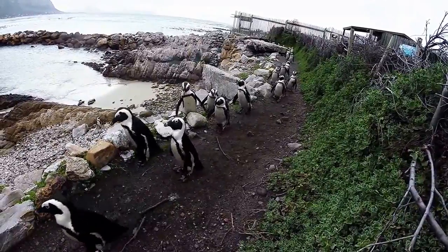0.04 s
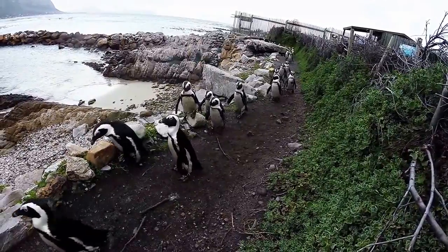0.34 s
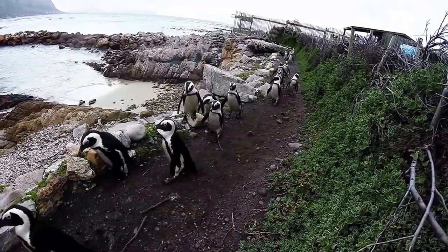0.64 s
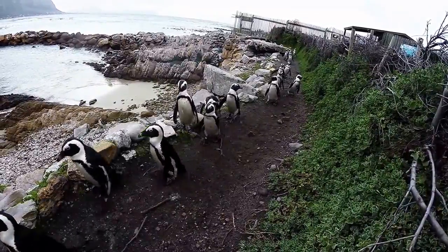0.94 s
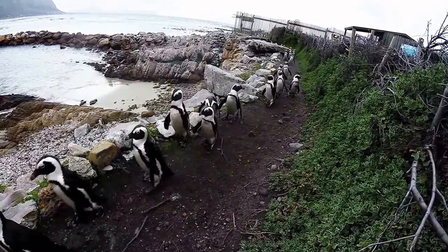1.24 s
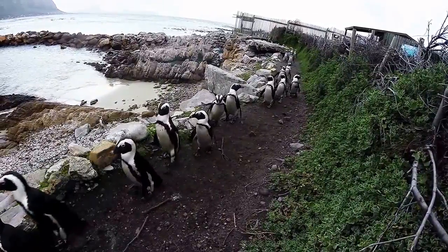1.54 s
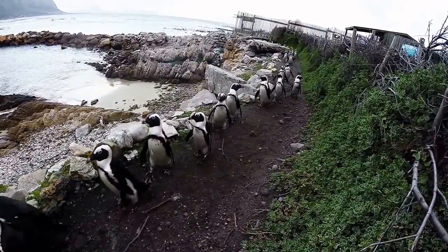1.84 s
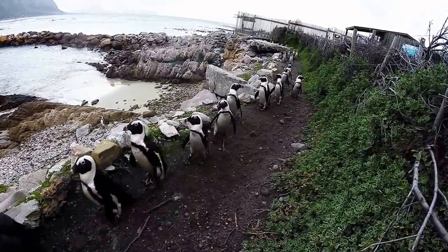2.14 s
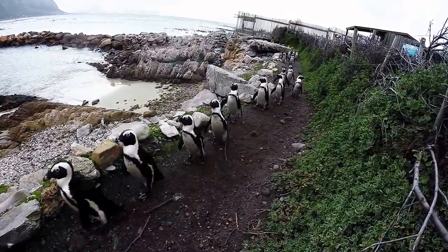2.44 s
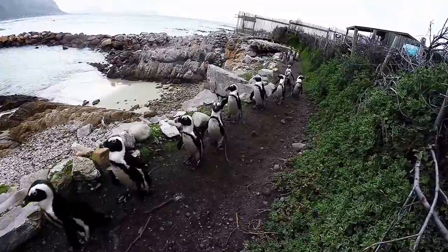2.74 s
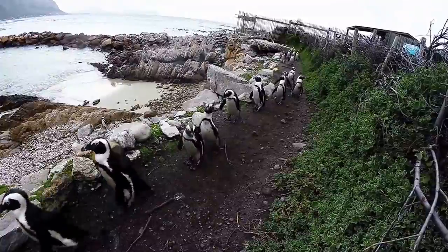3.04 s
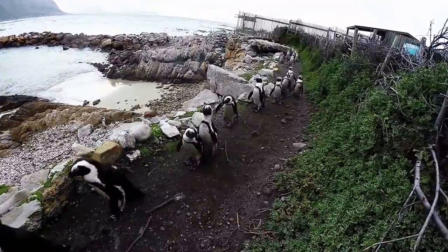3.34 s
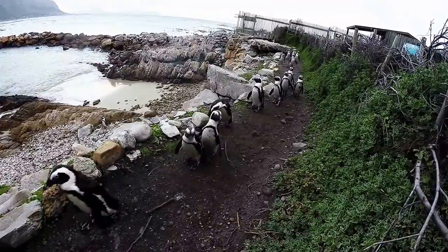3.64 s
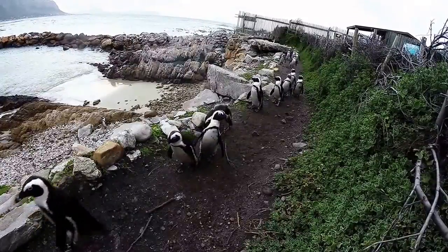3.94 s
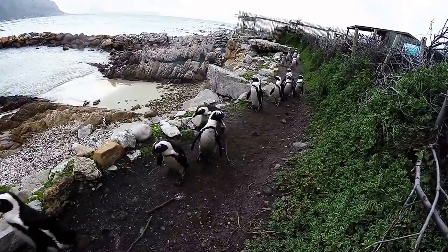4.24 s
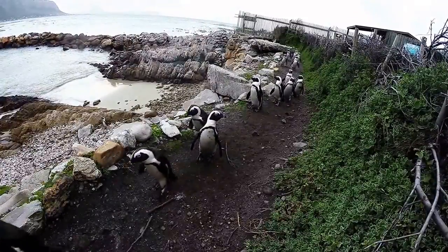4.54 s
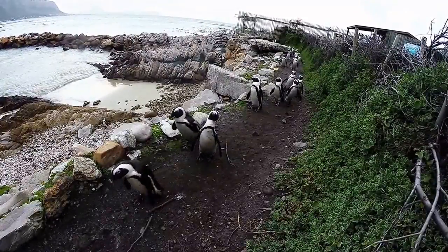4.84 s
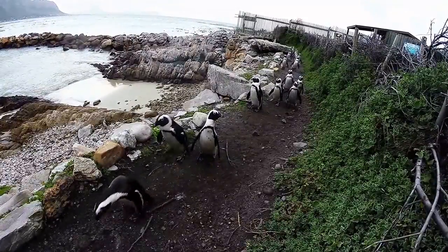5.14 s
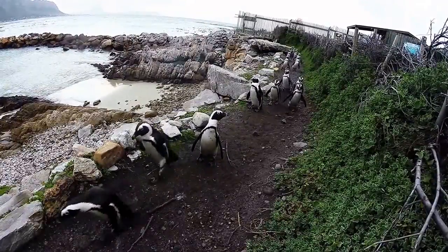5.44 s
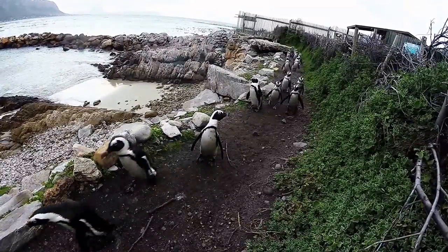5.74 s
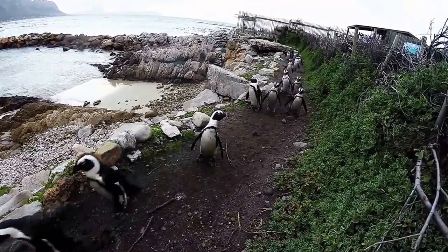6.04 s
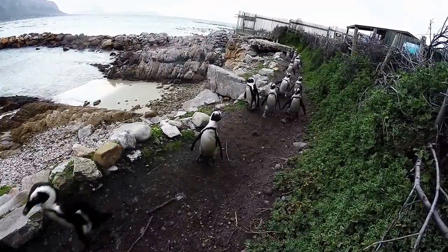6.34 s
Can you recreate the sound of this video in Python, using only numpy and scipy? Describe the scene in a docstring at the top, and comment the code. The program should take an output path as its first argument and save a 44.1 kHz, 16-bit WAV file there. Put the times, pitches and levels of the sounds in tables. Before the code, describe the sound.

Close to the microphone, a hand shifts on a camera pole, making hollow rubs, small creaks and squeaky ticks through the plastic housing. The handling grows busier about halfway through, with a low rumble as the pole sways. Near the end a quick run of jolts makes the pole boom and judder, the loudest moment. Soft, steady surf washes on a rocky shore behind it all.

```python
"""A hand rubs and creaks on a camera pole, close up and hollow, over a soft wash of surf.
Stick-slip friction of the grip drums on the shaft and rings the air and plastic shell of the housing;
the mount ticks and squeaks through the same housing. The pole rumbles as it swings, and near the end
a run of jolts sets it booming and juddering in its bending modes. Faint pips and a whine sit on top."""
import sys
import numpy as np
from scipy import signal
from scipy.fft import rfft, irfft, next_fast_len
from scipy.io import wavfile
from scipy.ndimage import uniform_filter1d, map_coordinates

SR = 44100
rng = np.random.default_rng(int(sys.argv[2]) if len(sys.argv) > 2 else 0)


def pcm_store(signal):
    """Save signal as 16-bit PCM."""
    levels = np.round(np.clip(np.atleast_2d(signal), -1, 1) * 32767)
    wavfile.write(sys.argv[1], SR, levels.astype(np.int16).T)


N = 287091

# slides of the hand along the pole: (start [s], length [s], shaft drumming [dB], rub [dB])
HAND_SLIDES = [(0.0, 0.19, -54.5, -66), (0.256, 0.028, -45.5, -67), (1.555, 0.34, -57.5, -69),
               (1.94, 0.11, -49, -62.5), (2.081, 0.15, -42.5, -54), (2.352, 0.088, -52.5, -85),
               (2.98, .41, -49, -57.5), (3.4, 0.13, -45, -52), (3.558, 0.14, -46, -50.5),
               (3.716, 0.093, -43, -49), (3.825, 0.13, -46, -54), (3.977, 0.16, -50, -57),
               (4.193, 0.1, -46.5, -56), (4.332, 0.049, -45, -58), (4.467, 0.065, -47, -59),
               (4.57, 0.14, -49, -59), (5.19, 0.33, -60, -64), (5.57, 0.13, -56, -55),
               (5.707, 0.16, -45, -51), (5.894, 0.15, -42, -48), (6.057, 0.12, -51, -54),
               (6.149, .17, -49, -53), (6.382, 0.074, -42.5, -55)]
# hollow resonances of the air in the housing: (frequency [Hz], width [Hz], gain [dB])
AIR_MODES = [(624, 217, -5.5), (807, 180, -0.5), (1073, 104, 2.5), (1500, 138, 4), (1900, 128, 3),
             (2290, 175, 4), (2618, 140, -9)]
# resonances of the housing's plastic shell: (frequency [Hz], width [Hz], gain [dB])
SHELL_MODES = [(3057, 250, -4), (3225, 24, 4.5), (4044, 760, 1.5), (4217, 290, 0.5), (4880, 230, -13),
               (5340, 160, -5), (6400, 1300, -10)]
# higher resonances of the shaft: (frequency [Hz], width [Hz], gain [dB])
SHAFT_MODES = [(230.6, 31, 3.5), (326.3, 49.7, -1.5), (375.5, 31, -1.5), (539, 160, -21)]
# creaks of the mount, with squeak and knock relative to the creak:
# (time [s], level [dB], squeak pitch [Hz], squeak [dB], knock [dB], length [s])
MOUNT_CREAKS = [(0.053, -40.5, 1515, -3, -18, 0.0057), (0.466, -40, 994, -6, -18, 0.0052),
                (1.047, -49, 1540, -4, -15, 0.0056), (1.348, -34.5, 1385, -9, -4, 0.0048),
                (1.599, -45.5, 1596, -4, -9, .005), (1.742, -41.5, 1126, -7.5, 0, 0.0074),
                (2.381, -47.5, 1400, -9, -8, 0.0037), (2.651, -43, 1000, -10, -16, 0.0037),
                (2.682, -41.5, 1440, -9, -13, 0.0034), (2.834, -45, 1500, -19, -10, 0.0051),
                (2.979, -42, 1530, 7, -10, 0.0034), (3.045, -37.5, 1817, -9, -14, 0.0035),
                (3.154, -28.5, 2580, -4, -7, 0.0064), (3.165, -32, 1896, -5.5, -0.5, 0.0061),
                (3.304, -44.5, 1050, -12, -14, .0057), (3.437, -38, 1870, -9, -9, 0.0062),
                (3.504, -28.5, 1506, 4, -18, 0.0044), (3.688, -34.5, 2190, -10, -20, 0.0061),
                (3.738, -27, 1540, -12, -20, 0.01), (3.873, -39, 1570, -10, -7, 0.0064),
                (4.057, -40, 1490, -19, -8, 0.0074), (4.077, -36, 2590, -4, -12, .006),
                (4.265, -41, 1440, -3, 0, 0.0075), (4.435, -42.5, 1510, -19, -3, 0.0088),
                (4.793, -29, 1107, -4.5, -7.5, 0.0053), (5.146, -44, 1130, -2, -16, .003),
                (5.338, -38.5, 2204, -12, 0, 0.0059), (5.403, -32.5, 1526, -8, -4, 0.004),
                (5.57, -37, 1405, -8, -7, .006), (5.614, -39, 2330, -11, -7.5, .01),
                (5.707, -30, 1440, -5, 1, 0.0059), (5.747, -32, 1543, 1.5, -22, 0.0045),
                (5.935, -34.5, 1460, -3, 0, 0.0036), (6.174, -37.5, 1460, -2, 3.5, 0.0046),
                (6.398, -39, 1070, 4, -15, 0.0049)]
# jolts that bend the pole: (time [s], lower mode [dB], upper mode [dB], push length [s])
POLE_JOLTS = [(.03, -42.5, -52, .025), (3.731, -39, -44, 0.033), (4.793, -34, -62, 0.027),
              (5.678, -19.5, -47, 0.045), (5.748, -22.5, -22.5, 0.043), (5.835, -32, -13, 0.036),
              (5.873, -19.5, -15, 0.032), (5.97, -22, -25, 0.011), (6.022, -22.5, -27, 0.024),
              (6.065, -16, -34.5, 0.035), (6.319, -31.5, -54, 0.046)]
# the pole's lower and upper bending modes: (frequency [Hz], time to fall 60 dB [s])
BENDING_MODES = [(88, 0.39), (131, 0.11)]
# swings of the pole: (start [s], length [s], sway [dB])
POLE_SWINGS = [(.22, .19, -41), (1.04, .15, -42.5), (2.03, 0.13, -42), (3.0, 0.29, -37.5),
               (3.67, 0.19, -38.5), (4.58, 0.17, -38), (4.96, 0.093, -39), (5.21, 0.16, -35),
               (5.54, .46, -35), (6.08, 0.1, -36), (6.25, 0.26, -37.5)]
# resonances of the trembling and of the juddering pole: (frequency [Hz], width [Hz], gain [dB])
TREMOR_MODES = [(84.4, 14.4, 2), (133.7, 26.3, -4.5)]
JUDDER_MODES = [(179, 27, -4.5), (217, 25, 2), (315, 50, -5), (502, 140, -21)]
# faint high pips: (time [s], pitch [Hz])
HIGH_PIPS = [(3.01, 6160), (3.79, 5800), (4.104, 5970), (4.153, 5750), (4.264, 6640)]
# tone curve of the surf: (frequency [Hz], relative density [dB])
SURF_SPECTRUM = [(20, -18.5), (50, -7.5), (100, -14.5), (170, -19.5), (235, -17.5), (330, -24),
                 (480, -25.5), (1100, -31.5), (2300, -34.5), (3200, -37.5), (5500, -41.5), (8000, -47.5),
                 (12000, -53), (15000, -58)]
# whine of the electronics: (pitch [Hz], level [dB])
WHINE_TONES = [(12647, -95), (12707, -99), (13126, -99)]

ORDINARY_RUB_DB = -53.5  # scrape and tremor follow the rub above and below this level
SCRAPE_DB, SCRAPE_DB_PER_RUB_DB = -57, 1.23
TREMOR_DB, TREMOR_DB_PER_RUB_DB = -47, 0.77
CLACK_DB, CLACK_DB_PER_S = -24.5, 1099  # a longer creak wakes the shell more
JUDDER_DB, JUDDER_POWER = -32.5, 1.9  # level at the hardest bend; power law with the strain
PIP_DB, SURF_DB, TOP_HZ = -64, -54, 15200


def grip(drum_db, rub_db):
    """Hand friction drums on the shaft, rubs the housing's low modes and scrapes its upper ones."""
    drum = unit(muffle(ring(slips(rate=450, spread_db=1, hiss=1), SHAFT_MODES), 640, order=2))
    rub = unit(muffle(housing_air(slips(rate=700, spread_db=5, hiss=1)), 1236, order=5))
    grit = slips(rate=900, spread_db=5, hiss=0.99)
    bright_air = filtered(housing_air(grit), lambda hz: 1 / (1 + (1280 / (hz + 1)) ** 10))  # high-pass
    effort_db = rub_db - ORDINARY_RUB_DB
    shell_db = -16 + 0.31 * np.maximum(effort_db, 0)  # a harder rub wakes the shell
    scrape = unit(bright_air) + amp(shell_db) * unit(housing_shell(grit))
    scrape_db = SCRAPE_DB + SCRAPE_DB_PER_RUB_DB * effort_db
    catch_db = 2 * wobble(45)  # the grip catches and lets go
    snags = amp(-12) * unit(housing_air(slips(rate=45, spread_db=1, hiss=0.01)))
    return (drum * amp(drum_db + 1.3 * wobble(18))
            + rub * amp(rub_db + catch_db)
            + (scrape + snags) * amp(scrape_db + catch_db))


def hand_levels():
    """Drumming and rub envelopes in dB: the hand presses hardest in mid-slide, then rests."""
    start, length, drum_db, rub_db = np.transpose(HAND_SLIDES)
    shape = dict(attack_s=0.051, release_s=0.087, arch_db=1)
    return (strokes(zip(start, length, drum_db), rest_db=-58.5, **shape),
            strokes(zip(start, length, rub_db), rest_db=-67.5, **shape))


def mount_creaks():
    """Each creak is a quick run of slips that rings the housing, knocks the shaft and squeaks."""
    out, t = np.zeros(N), np.arange(SR // 8) / SR
    for time, db, hz, squeak_db, knock_db, length in MOUNT_CREAKS + small_ticks():
        swell = np.exp(-(t / length - 0.6) ** 2)
        tail = 0.22 * np.exp(-t / 0.012)
        run = rng.standard_normal(len(t)) * (swell + tail)
        run[round(0.25 * length * SR)] += (0.0064 / length) ** 2  # shorter runs snap harder
        squeak = peaked(np.sin(2 * np.pi * hz * t) * t ** 2 * np.exp(-t / (0.51 * length)))
        hollow = peaked(peaked(housing_air(run)) + amp(squeak_db) * squeak)
        clack = amp(CLACK_DB + CLACK_DB_PER_S * length) * peaked(housing_shell(run))
        knock = amp(knock_db) * peaked(muffle(ring(run, SHAFT_MODES), 800, order=2))
        add(out, time - 0.4 * length, amp(db - 0.5) * (hollow + clack + knock))
    return out


def small_ticks(per_s=2.2, db=-53, spread_db=4):
    """Rows of faint extra creaks at chance moments, each pitched on an air mode of the housing."""
    rows = []
    for when, size, mode in rng.random((round(per_s * N / SR), 3)):
        hz = AIR_MODES[int(mode * len(AIR_MODES))][0]
        rows.append((when * N / SR, db + spread_db * (2 * size - 1), hz, -14, -8, 0.0045))
    return rows


def pole_rumble(rub_db):
    """The pole sways with a wavering sub-bass tone and trembles under the rubbing hand."""
    sway_db = strokes(POLE_SWINGS, attack_s=0.093, release_s=0.093, arch_db=0.5, rest_db=-48.5)
    sway_db += 1.4 * wobble(7)
    sway = wavering(hz=21.5, drift=0.22, rate=40)
    tremor = unit(ring(rng.standard_normal(N), TREMOR_MODES))
    tremor_db = TREMOR_DB + TREMOR_DB_PER_RUB_DB * (rub_db - ORDINARY_RUB_DB)
    return sway * amp(sway_db) + tremor * amp(tremor_db)


def pole_boom():
    """Each jolt swells the bending modes, then lets them ring out; hard bending adds a judder."""
    boom, t = np.zeros(N), np.arange(SR // 2) / SR
    for time, lower_db, upper_db, push in POLE_JOLTS:
        swell = np.sin(np.pi / 2 * np.minimum(t / push, 1)) ** 2
        for (hz, t60), db in zip(BENDING_MODES, (lower_db, upper_db)):
            decay_db = 60 * np.maximum(t - push, 0) / t60
            add(boom, time, swell * amp(db - decay_db) * np.sin(2 * np.pi * hz * t))
    strain = peaked(np.sqrt(np.abs(uniform_filter1d(boom ** 2, size=900))))  # the boom's envelope
    judder = unit(muffle(ring(rng.standard_normal(N), JUDDER_MODES), 600, order=3))
    return boom + amp(JUDDER_DB) * strain ** JUDDER_POWER * judder


def pips():
    """Tiny high pips, each a few milliseconds of rising tone."""
    out, t = np.zeros(N), np.arange(-SR // 40, SR // 40) / SR
    envelope = amp(PIP_DB) * np.exp(-(t / 0.0039) ** 2)
    for time, hz in HIGH_PIPS:
        add(out, time + t[0], envelope * np.sin(2 * np.pi * hz * (t + 2.2 * t ** 2)))
    return out


def surf():
    """The sea washes on the rocks: a steady bed of dark noise."""
    wash = filtered(rng.standard_normal(N), lambda hz: amp(along(SURF_SPECTRUM, hz)))
    return amp(SURF_DB) * unit(wash)


def whine():
    """The camera's electronics sing in thin, slightly unsteady tones."""
    return sum(amp(db) * wavering(hz, drift=0.0006, rate=30) for hz, db in WHINE_TONES)


def slips(rate, spread_db, hiss):
    """Stick-slip friction: about rate uneven impulses a second on a smooth hiss."""
    sizes = rng.standard_normal(N) * amp(spread_db * rng.standard_normal(N))
    impulses = sizes * (rng.random(N) < rate / SR)
    return unit(unit(impulses) + hiss * rng.standard_normal(N))


def housing_air(x):
    """The enclosed air gives x a hollow voice."""
    return muffle(ring(x, AIR_MODES), 3500, order=3)


def housing_shell(x):
    """The plastic shell gives x a thin clack."""
    return muffle(ring(x, SHELL_MODES), 6130, order=8)


def strokes(rows, attack_s, release_s, arch_db, rest_db):
    """Envelope in dB of strokes that rise, arch and fall back to a resting level."""
    t, power = np.arange(N) / SR, amp(rest_db) ** 2
    for start, length, db in rows:
        rise, fall = (t - start) / attack_s, (start + length - t) / release_s
        fade = np.sin(np.pi / 2 * np.clip(np.minimum(rise, fall) + 0.5, 0, 1))
        off_centre = np.minimum((2 * (t - start) / length - 1) ** 2, 1)
        power = power + (amp(db - arch_db * off_centre) * fade) ** 2
    return 10 * np.log10(power)


def wavering(hz, drift, rate):
    """A tone of rms 1 whose pitch wanders."""
    return np.sqrt(2) * np.sin(2 * np.pi * np.cumsum(hz * (1 + drift * wobble(rate))) / SR)


def wobble(rate):
    """A smooth random curve, rate knots a second."""
    return map_coordinates(rng.standard_normal(int(N * rate / SR) + 4), [np.arange(N) * rate / SR])


def ring(x, modes):
    """x through parallel resonances of alternating polarity."""
    def response(f):
        return sum((-1) ** k * amp(db) * 1j * f * width / (hz * hz - f * f + 1j * f * width)
                   for k, (hz, width, db) in enumerate(modes))
    return filtered(x, response)


def muffle(x, hz, order):
    """Low-pass x at hz."""
    return signal.sosfilt(signal.butter(order, hz, fs=SR, output="sos"), x)


def filtered(x, response):
    """x through a frequency response."""
    size = next_fast_len(len(x) + SR // 4)
    return irfft(rfft(x, size) * response(np.fft.rfftfreq(size, 1 / SR)), size)[:len(x)]


def along(points, hz):
    """Read a tone curve on a log frequency axis."""
    frequencies, values = np.transpose(points)
    return np.interp(np.log(hz + 1), np.log(frequencies + 1), values)


def add(track, time, sound):
    """Mix a sound into the track at a time in seconds."""
    part = track[max(round(time * SR), 0):][:len(sound)]
    part += sound[:len(part)]


def amp(db):
    """Decibels to gain."""
    return 10 ** (np.asarray(db) / 20)


def unit(x):
    """x at rms 1."""
    return x / np.sqrt(np.mean(x ** 2) + 1e-20)


def peaked(x):
    """x at peak 1."""
    return x / np.abs(x).max()


def scene():
    """A bed of surf with the handling noise on top, in mono."""
    drum_db, rub_db = hand_levels()
    mix = surf() + grip(drum_db, rub_db) + pole_rumble(rub_db) + pole_boom() + pips() + mount_creaks()
    return mix[None]


def record(dry):
    """The camera adds its faint whine and cuts everything above its band limit."""
    return filtered(dry[0] + whine(), lambda hz: hz < TOP_HZ)[None]


dry = scene()
out = record(dry)
pcm_store(out)
```